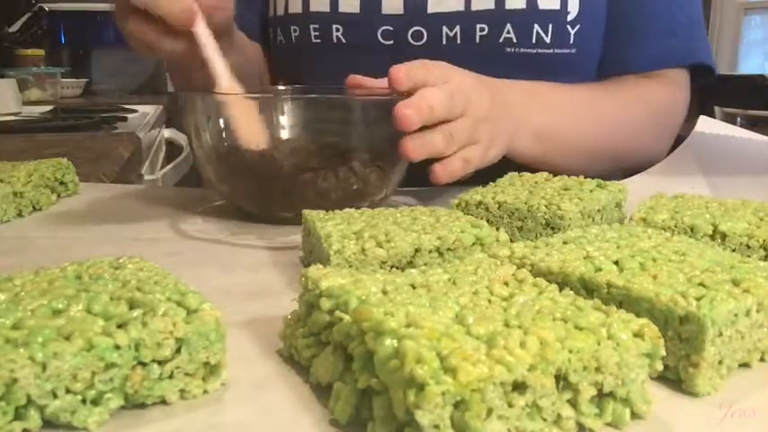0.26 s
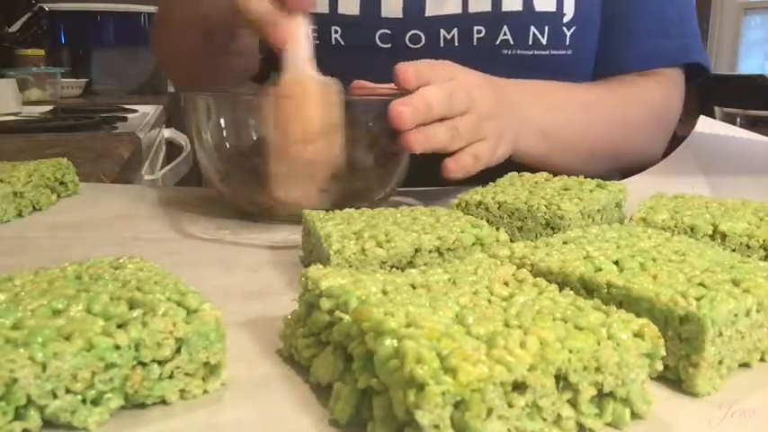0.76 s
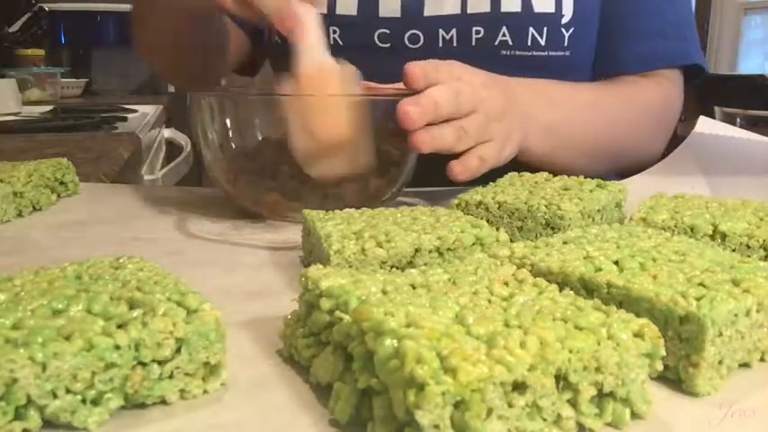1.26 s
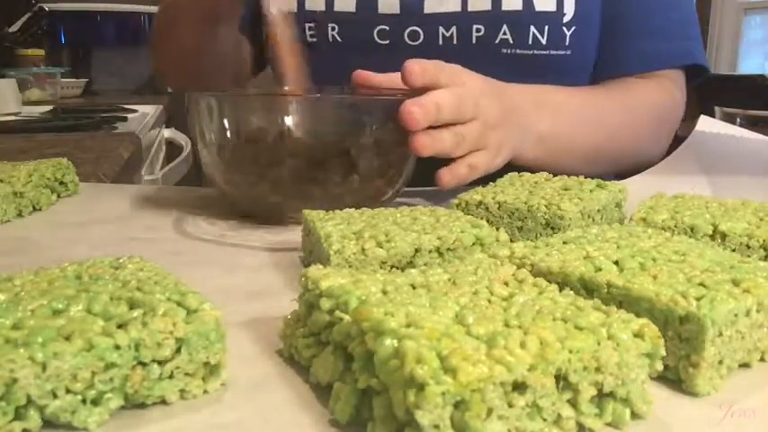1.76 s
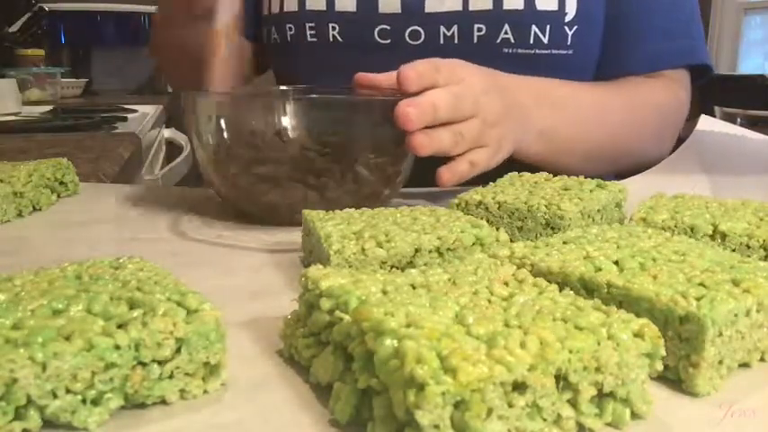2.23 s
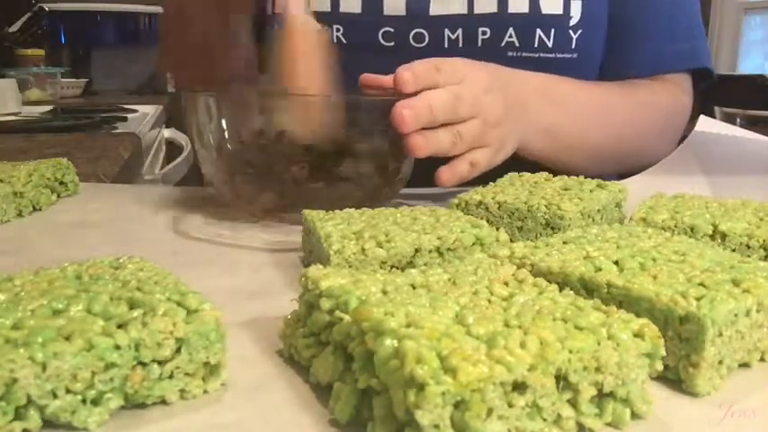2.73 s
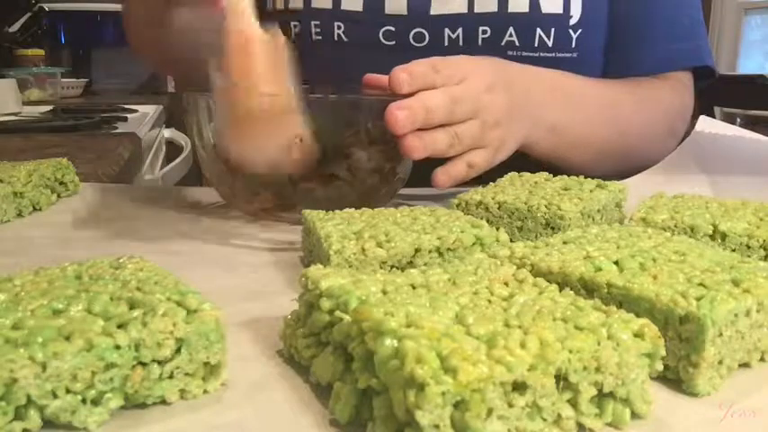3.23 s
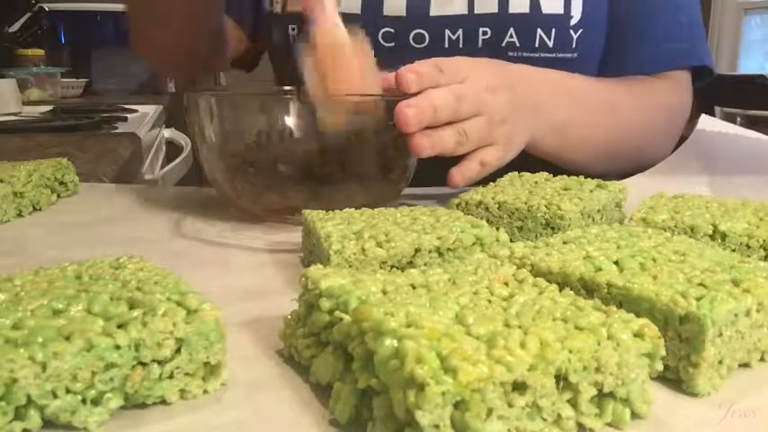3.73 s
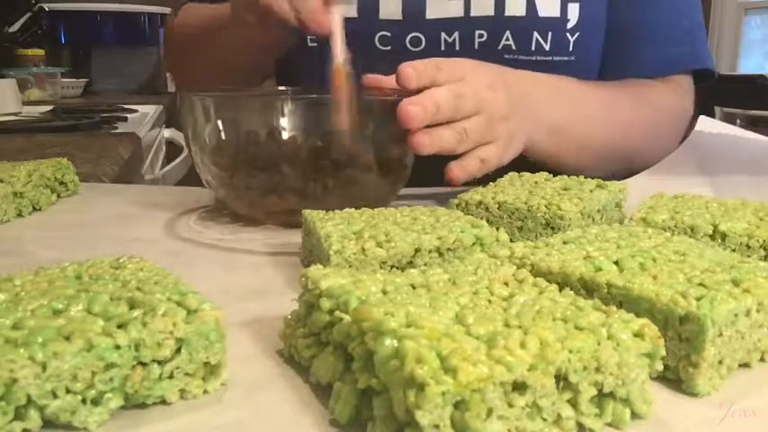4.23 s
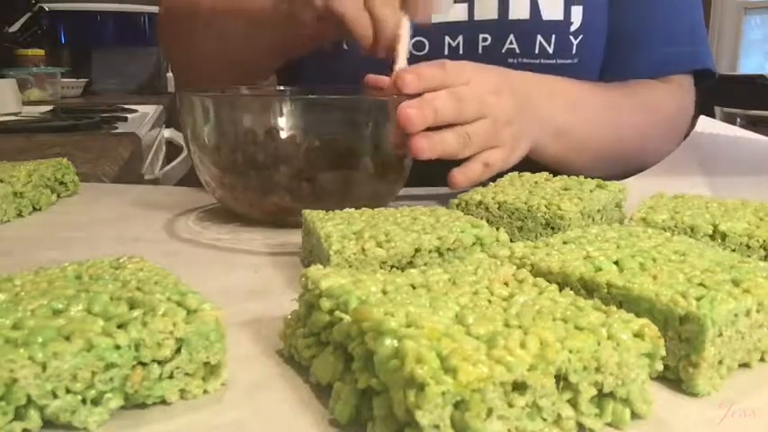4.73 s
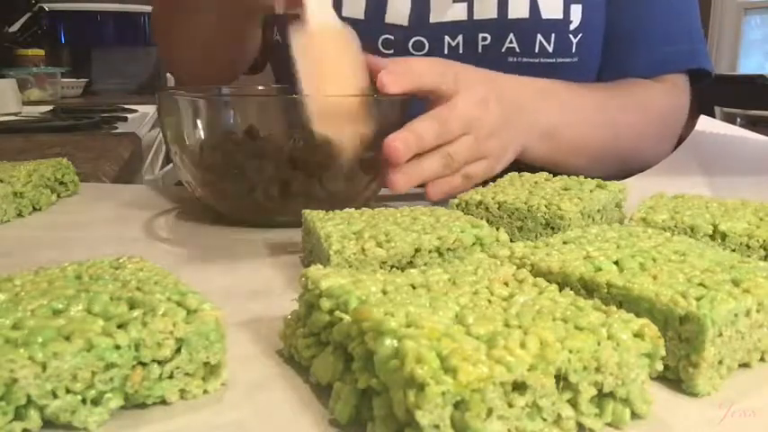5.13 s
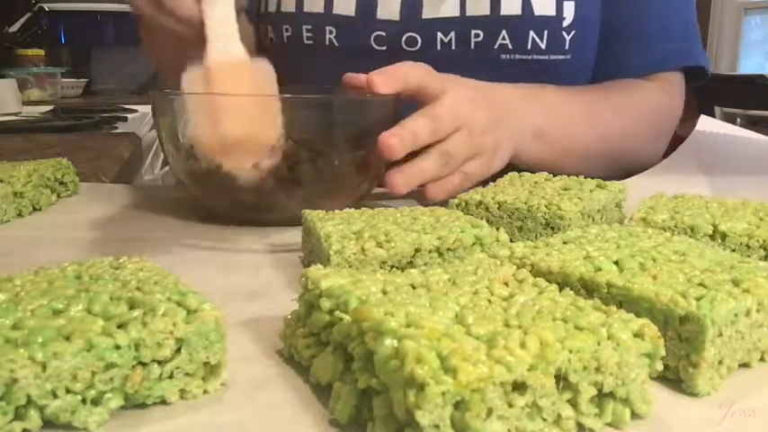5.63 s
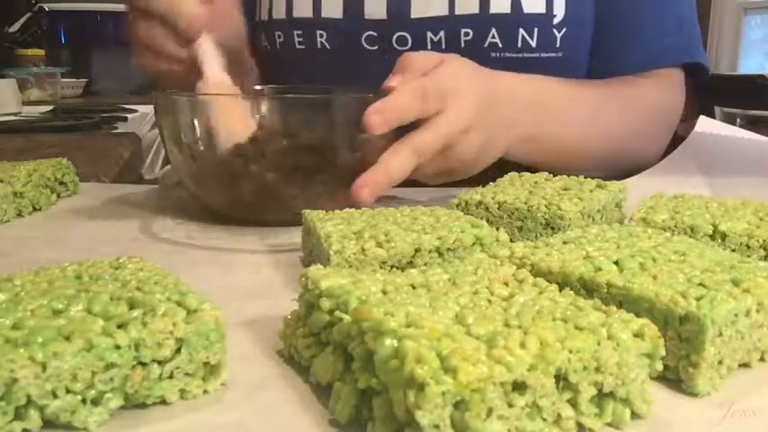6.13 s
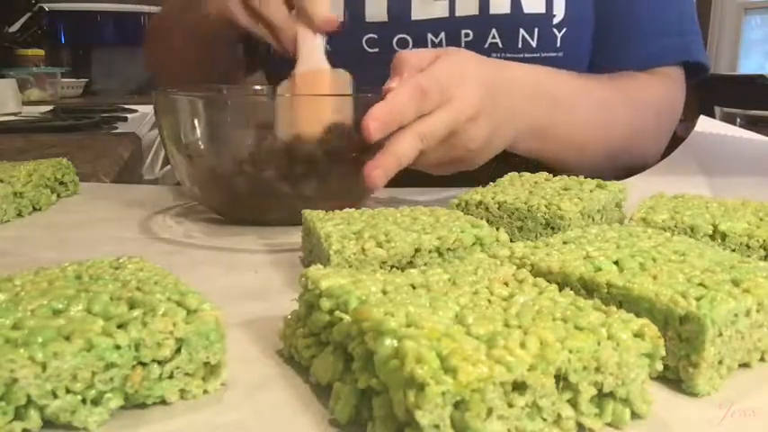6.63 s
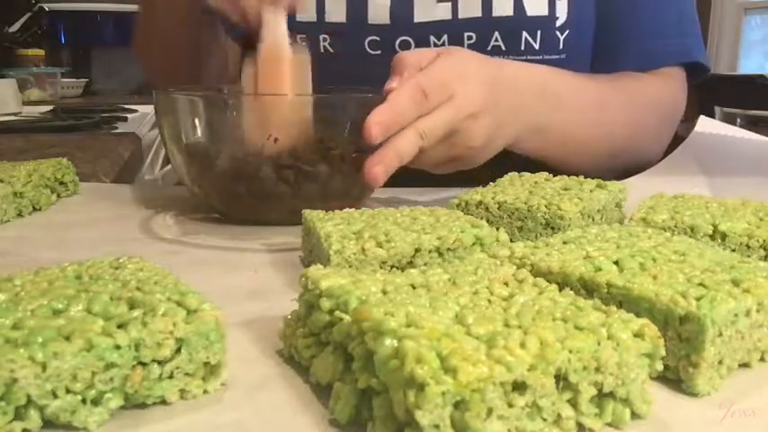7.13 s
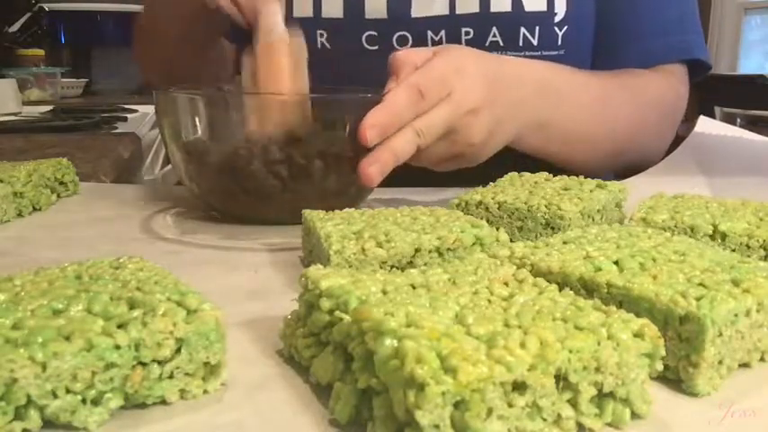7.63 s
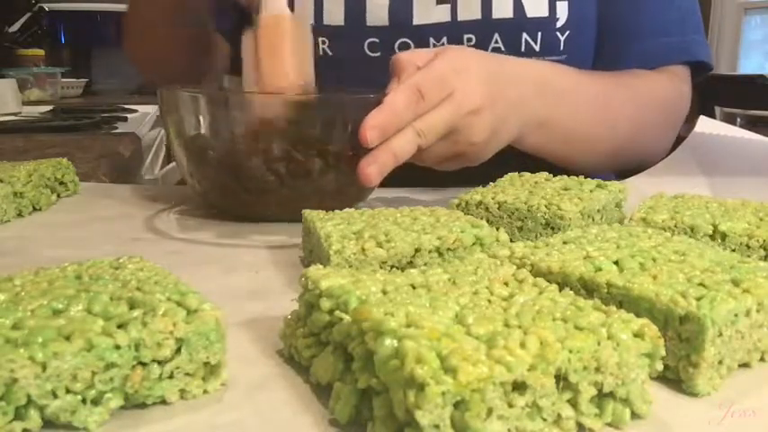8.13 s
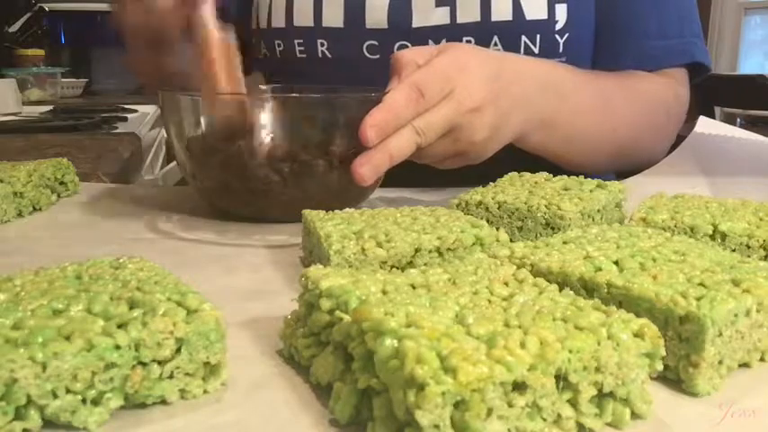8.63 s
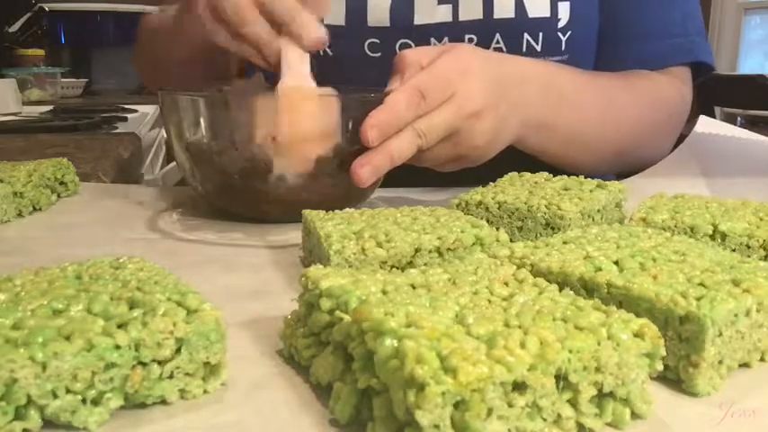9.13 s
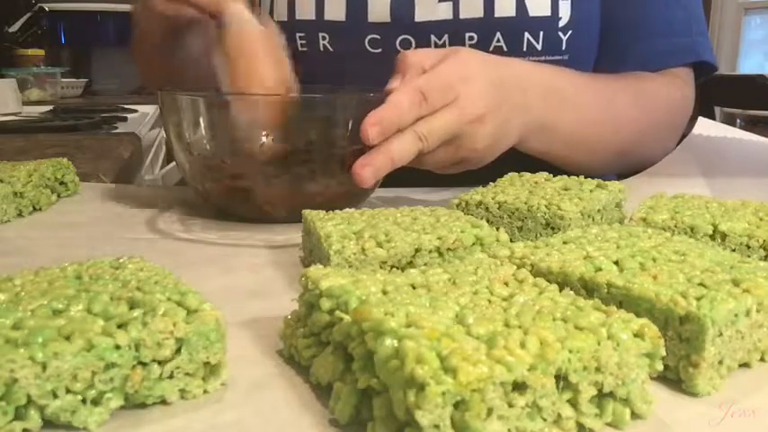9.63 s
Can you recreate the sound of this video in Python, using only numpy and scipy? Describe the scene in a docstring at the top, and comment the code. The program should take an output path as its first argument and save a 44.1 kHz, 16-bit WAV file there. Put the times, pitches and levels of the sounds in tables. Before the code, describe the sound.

Irregular stirring from start to end: short, gritty, squelching strokes of a blade in gooey mixture, with brief clinks against glass that die almost at once. Muffled low bumps follow as the bowl rolls on its foot, with occasional firmer knocks on the counter, tiny cracks of sticky strands and thin, high skids. Heard close in a quiet room with slight reverberation.

```python
"""On a kitchen counter, a spatula stirs a thick melted mixture in a hand-held glass bowl.
Clumped noise grains through coloured filters and small resonators make the blade rub and squelch.
Decaying glass modes and noise make the neck clink; short noise bursts make strands snap and the edge skid.
As the bowl rocks and knocks, low decaying modes give the counter's hollow boom.
Wall reflections and a quiet hush surround it all."""
import sys
import numpy as np
from scipy import signal
from scipy.fft import rfft, irfft
from scipy.io import wavfile

SR = 44100
rng = np.random.default_rng(int(sys.argv[2]) if len(sys.argv) > 2 else 0)


def store_wav(level_fs):
    """Save 16-bit WAV to argv[1]."""
    pcm = np.round(np.clip(np.atleast_2d(level_fs), -1, 1) * 32767)
    wavfile.write(sys.argv[1], SR, pcm.T.astype(np.int16))


N = 435708

# Sweeps of the blade through the mixture. Each row: hardest press in seconds, swell in seconds,
# fade in seconds, level in dB, bareness of the glass in dB.
SWEEPS = [(0.061, 0.051, 0.065, -64, 1), (0.36, 0.19, 0.04, -66, 0.5), (0.54, 0.062, 0.048, -52.5, 4),
          (0.75, 0.18, 0.2, -66.5, 1), (1.0, 0.19, 0.065, -66, 1.5), (1.26, 0.04, 0.063, -58.5, -6.5),
          (1.33, 0.05, 0.088, -63.5, 5), (1.66, 0.098, 0.15, -65.5, 1), (1.85, 0.084, 0.023, -58, -1),
          (2.258, 0.13, 0.054, -63.5, 4.5), (2.478, 0.059, 0.02, -67, 3.5), (2.759, 0.1, 0.061, -57, -2.5),
          (3.392, 0.026, 0.045, -59.5, -2), (3.582, 0.087, 0.03, -63, 2.5), (3.83, 0.018, 0.11, -62.5, 6.5),
          (4.0, 0.072, 0.09, -57.5, 1.5), (4.35, 0.075, 0.063, -64.5, -3), (4.65, 0.022, 0.046, -75.5, 1),
          (4.89, .03, 0.072, -57.5, -3.5), (4.97, 0.046, 0.02, -60.5, -4),
          (5.251, 0.052, 0.027, -60.5, -2.5), (5.389, 0.022, 0.035, -57.5, -0.5),
          (5.449, 0.035, 0.023, -59.5, -1), (5.661, 0.039, 0.029, -66.5, 2),
          (5.952, 0.034, 0.071, -62, 2.5), (6.318, 0.023, 0.036, -63.5, 2.5), (6.46, 0.053, 0.054, -60, 7),
          (6.65, 0.087, 0.055, -74.5, 5.5), (6.809, 0.037, 0.022, -69, 4.5),
          (6.981, 0.085, 0.059, -61.5, 3), (7.359, 0.016, 0.048, -63.5, 4.5),
          (7.95, 0.086, 0.065, -61, 0.5), (8.145, 0.018, 0.051, -65.5, -6),
          (8.37, 0.073, 0.059, -65.5, 0.5), (8.48, 0.077, 0.023, -60.5, -3),
          (8.72, 0.041, 0.21, -62.5, -4.5), (8.97, 0.034, 0.046, -65, -0.5), (9.24, 0.11, .06, -69.5, 2.5),
          (9.6, 0.077, .05, -63.5, -1.5)]
# Clinks of the spatula on glass. Each row: contact in seconds, level in dB,
# hardness in dB (upper modes over the lowest), crack over the ring in dB.
GLASS_TOUCHES = [(0.4983, -37.5, -21.5, -24), (0.5137, -37, -3, -4), (0.5462, -25.5, -7, -7),
                 (1.0234, -40.5, -11.5, 8), (1.4665, -41, -5, -7), (1.472, -45, -15, 13),
                 (1.5678, -40.5, -10, -4), (1.7374, -45.5, -17, -33), (1.8614, -41, -16, -16),
                 (1.9632, -47, -20, -9), (1.976, -45.5, -20, 1), (2.2293, -49.5, -24, -30),
                 (2.268, -47, -6.5, -15), (2.3085, -42.5, -17, -22), (2.753, -35, -3, 0),
                 (2.7756, -33, 11, -14), (2.7894, -31, -5, -7), (3.7998, -32, -6, 3.5),
                 (3.8114, -40, -13, 37), (5.219, -35.5, -3.5, -25), (5.6042, -49, -13, -13),
                 (5.9029, -31.5, 4, 4.5), (5.9419, -43.5, -4, 4), (6.075, -57, -18, -3),
                 (6.1807, -49.5, -26, -12), (6.3885, -37.5, -9, 8), (6.3935, -32.5, -11.5, 4.5),
                 (6.4558, -20.5, 11.5, -2.5), (6.6322, -47.5, -17, -29), (6.8907, -33.5, -6.5, 1),
                 (6.9032, -28, -14.5, -0.5), (7.3361, -47, -15, -16), (7.344, -41, -8, -7),
                 (7.531, -59, -27, -23), (7.8346, -43.5, -15, -1), (8.2053, -51.5, -28, -33),
                 (8.6847, -48.5, -13, -14), (9.1651, -47, -19, -12)]
# Sticky strands snapping. Each row: start in seconds, level in dB, centre in Hz (1100 at least is used).
STRAND_SNAPS = [(0.6587, -46, 2500), (0.7488, -50, 2000), (0.979, -47.5, 1820), (1.1855, -51.5, 1670),
                (1.343, -41.5, 8500), (1.8038, -44.5, 1160), (1.844, -44, 1960), (1.8974, -40.5, 1160),
                (2.0382, -45.5, 8400), (2.132, -41.5, 1117), (2.458, -47, 1980), (2.611, -49, 1500),
                (2.939, -53.5, 1500), (3.0376, -52, 6470), (3.045, -40, 1800), (3.8977, -38.5, 1170),
                (3.9773, -40, 1160), (4.043, -54, 1120), (4.3202, -44.5, 1970), (4.3634, -46, 1090),
                (4.4251, -45.5, 1160), (4.74, -46.5, 10300), (4.9945, -43, 2080), (6.0135, -42.5, 10500),
                (6.552, -45.5, 2290), (6.659, -49, 1980), (7.0713, -48, 2020), (7.4025, -34, 3400),
                (7.96, -38, 1170), (7.9697, -35, 1160), (8.307, -45, 8000), (8.3118, -34, 1100),
                (8.358, -42, 1120), (8.9487, -43, 2120), (9.255, -44, 1260), (9.603, -44, 2090)]
# The blade's edge skidding on bare glass. Each row: start in seconds, level in dB, length in seconds,
# centre in Hz.
EDGE_SKIDS = [(0.025, -43.5, 0.01, 4030), (2.754, -45, 0.018, 11500), (4.861, -54, 0.06, 10300),
              (5.378, -52, 0.043, 12100), (5.838, -49, 0.031, 12400), (6.435, -44, .004, 7960),
              (6.852, -47, 0.008, 10000), (6.967, -36, 0.0054, 9100), (7.961, -43, 0.013, 9400),
              (8.744, -43.5, 0.012, 5240), (8.789, -49, 0.035, 5240), (8.95, -47, 0.014, 5100),
              (9.592, -40.5, 0.0065, 8930)]
# The bowl's foot dropping on the counter. Each row: start in seconds, boom level in dB, clack level in dB.
FOOT_DROPS = [(1.709, -34, -37.5), (2.138, -38.5, -49.5), (3.93, -33, -36), (4.742, -48.5, -96),
              (7.756, -53.5, -48.5), (7.912, -37, -83), (8.313, -33, -67), (8.599, -32, -32.5),
              (9.265, -39.5, -43.5), (9.56, -45, -80)]
# The bowl rocking under the blade. Each row: start in seconds, level in dB, centre of the push in Hz.
BOWL_ROCKS = [(0.028, -50, 184), (0.25, -51.5, 230), (0.52, -63, 225), (0.668, -44.5, 190),
              (0.739, -49.5, 149), (0.85, -53, 210), (1.189, -46, 194), (1.315, -46, 228),
              (1.57, -38.5, 196), (1.955, -44, 166), (1.984, -40.5, 164), (2.327, -44.5, 203),
              (2.466, -41, 189), (2.707, -53.5, 190), (2.938, -47, 210), (3.031, -43.5, 194),
              (3.322, -46.5, 178), (3.374, -45, 203), (3.558, -47.5, 197), (3.795, -38.5, 245),
              (3.825, -39.5, 128), (4.163, -46, 123), (4.313, -43.5, 181), (4.422, -47, 200),
              (4.591, -46.5, 189), (5.235, -50, 242), (5.409, -47, 296), (5.637, -53, 185),
              (5.958, -40.5, 200), (5.972, -36, 195), (6.572, -48.5, 193), (6.623, -50.5, 195),
              (6.995, -45, 200), (7.032, -45, 200), (7.341, -42, 188), (7.396, -39.5, 202),
              (7.846, -43.5, 186), (8.373, -38, 200), (9.159, -44.5, 200), (9.494, -47.5, 160),
              (9.599, -48, 195)]

# Modes of the glass bowl. Each row: frequency in Hz before the blade's pull, level in dB,
# T60 relative to the main mode.
GLASS_MODES = [(2039.5, -1, 1.85), (3494, -3, 1.75), (3680, -0.5, 0.51), (5200, -16, 0.39), (5247, 4, 1.13),
               (5500, -3, 1.7), (7300, -3.5, 1.3), (9480, -15, 1.3), (11850, -26, .5)]
# Modes of the counter with the bowl on it. Each row: frequency in Hz, level in dB, T60 in seconds.
COUNTER_MODES = [(79.4, -12.5, 0.28), (100, -19, 0.18), (127.4, -2.5, 0.11), (178, 0, 0.13),
                 (206.2, -0.5, 0.17), (251.7, 0, 0.096), (291, 2, 0.089), (376.4, -8.5, 0.17),
                 (454.4, -2.5, 0.14), (527.5, -9, 0.12), (603.5, -2, 0.09)]

# Colours of the sounds. Each row: frequency in Hz, level in dB per Hz.
RUB_COLOUR = [(250, -3.5), (500, 3.5), (700, -10.5), (880, 2.5), (1000, 0.5), (1170, 4), (1600, -4),
              (2200, -8.5), (3000, -6), (5000, -34), (12000, -34)]  # blade in the mixture
CRACKLE_COLOUR = [(1200, -6.5), (2800, 2), (4000, 0.5), (5500, -3), (7500, -5.5), (9500, -3.5),
                  (12000, -17.5), (16000, -19.5)]  # fine wet crackle
CONTACT_COLOUR = [(300, -6.5), (900, 14), (1500, 4), (2600, 12.5), (3700, 14.5), (5600, 9.5), (6500, -1.5),
                  (9000, -6.5), (16000, -22.5)]  # gritty touch of the spatula
CRACK_COLOUR = [(1000, -12.5), (4000, -7.5), (9000, -2.5), (12000, -8.5), (14000, -23.5), (16000, -17)]  # crack of a hard touch
CLACK_COLOUR = [(300, -58), (550, -1.5), (700, -3), (880, -1.5), (1000, -10.5), (1150, 0), (1320, -4),
                (1700, -17.5), (3000, -34), (8000, -40)]  # the foot's clack
REFLECTION_COLOUR = [(60, 2.5), (250, 5.5), (1000, -4.5), (5000, -1.5), (8000, -5), (15000, -5.5)]  # the room's reflections
HUSH_COLOUR = [(15, -49.5), (25, -12), (191, -2.5), (278, -8), (673, -24.5), (1150, -22), (1630, -30.5),
               (1960, -23), (2240, -30.5), (15000, -35)]  # the room's hush

CUTOFF_HZ = 16000
AGE = np.arange(SR // 2) / SR  # time since a contact, in seconds
MAIN_HZ = 5222  # reference pitch: the bowl's strongest mode when it rings freely
STROKE_SHAPE = 1.11  # exponent of each swell and fade: 1 is pointed, 2 is bell-shaped
RESTING_DB = -84.5  # the blade never quite leaves the mixture
USUAL_DB = -68  # reference level of an ordinary stroke
RING_T60_S = 0.055  # main mode under the pressed blade, at hardness 0
RING_DOUBLES_DB = 45.5  # a harder touch leaves the glass freer: this much hardness doubles the ring
SAG_HZ, SAG_HZ_PER_DB = 29.3, 1  # load lowers the main mode, less for a hard touch; then varied at random
USUAL_ROCK_HZ = 195  # slower rocking than this heaves the counter more


def from_db(db):
    """Decibels to gain."""
    return 10 ** (np.asarray(db) / 20)


def rms_one(x):
    """Scale to unit rms."""
    return x / np.sqrt(np.mean(x ** 2) + 1e-20)


def peak_one(x):
    """Scale to unit peak."""
    return x / (np.abs(x).max() + 1e-20)


def dying(t60):
    """Exponential decay after a contact, down 60 dB at t60 seconds."""
    return np.exp(-np.log(1000) * AGE / max(t60, 1e-3))


def ring(hz, t60, phase=0):
    """One decaying mode."""
    return np.sin(2 * np.pi * hz * AGE + phase) * dying(t60)


def add(track, s, sound):
    """Mix a sound into the track at time s."""
    start = max(round(s * SR), 0)
    track[start:start + len(sound)] += sound[:N - start]


def through(x, response):
    """Pass x through an impulse response."""
    return signal.fftconvolve(x, response)[:len(x)]


def soften(x, cut_hz):
    """A soft contact passes mostly low frequencies."""
    return signal.sosfilt(signal.butter(3, cut_hz, fs=SR, output="sos"), x)


def response_of(colour, size=4096):
    """Causal (minimum-phase) impulse response with the given spectrum."""
    hz, db = np.transpose(colour)
    grid = np.maximum(np.arange(size // 2 + 1) * SR / size, 1)
    gain = from_db(np.interp(np.log(grid), np.log(hz), db))
    # folding the cepstrum onto positive time puts the energy as early as possible
    cepstrum = irfft(np.log(gain))
    cepstrum[1:size // 2] *= 2
    cepstrum[size // 2 + 1:] = 0
    return irfft(np.exp(rfft(cepstrum)))


def burst(colour, envelope):
    """A spray of tiny contacts with the given colour; peak 1."""
    noise = rng.standard_normal(len(AGE)) * envelope
    return peak_one(through(noise, response_of(colour)))


def drift(per_s):
    """Slow random wander of unit rms, with per_s new targets a second."""
    steps = np.arange(N) / SR * per_s
    return rms_one(np.interp(steps, np.arange(4000), rng.standard_normal(4000)))


def counter_ring(centre_hz, db_per_octave, scatter=0.0):
    """Modes near the pace of the push answer most; phases alternate, with a random scatter."""
    count = len(COUNTER_MODES)
    phases = np.pi * np.arange(count) + scatter * rng.standard_normal(count)
    out = np.zeros(len(AGE))
    for (hz, db, t60), phase in zip(COUNTER_MODES, phases):
        octaves_off = abs(np.log2(hz / centre_hz))
        out += from_db(db - db_per_octave * octaves_off) * ring(hz, t60, phase)
    return out


def stirring(drag_db=-62.5, drag_follows=0.66, rub_db=0.5, sing_db=-4.0, wet_db=-3.0,
             big_db=-8.5, small_db=-7.5, uneven_db=4.0, tick_db=-8.0, hum_db=-12.5,
             fall_db_per_octave=-12.0, glass_t60=0.027, pull=0.96):
    """Stick-slip of the blade shakes counter and glass while air pockets pop in the mixture."""
    rub, sing, wet = pressure(bare_share=0), pressure(bare_share=1.5), pressure(bare_share=1.0)
    uneven = from_db(uneven_db * np.tanh(drift(per_s=35)))  # lumps in the mixture
    drag = (pressure(bare_share=0, stretch=1.17) / from_db(USUAL_DB)) ** drag_follows

    # slow judder passes through the foot into the counter
    judder = grains(per_s=330, spread_db=5.0, clump_db=3.5)
    shaken_counter = through(judder, counter_ring(centre_hz=200, db_per_octave=0.5))
    rumble = rms_one(soften(shaken_counter, cut_hz=408))

    # fine slips, and now and then a coarser catch
    slips = rms_one(grains(per_s=6000, spread_db=1.5, clump_db=6.5))
    catches = rms_one(grains(per_s=40, spread_db=0.0, clump_db=2.5))
    big_bursts = grains(per_s=500, spread_db=-2.0, clump_db=8.0)
    big_pops = squelch(big_bursts, low_hz=620, high_hz=2960, cycles=16)
    small_bursts = grains(per_s=600, spread_db=3.0, clump_db=17.0)
    small_pops = squelch(small_bursts, low_hz=2550, high_hz=14900, cycles=9.9)

    glass = np.zeros(len(AGE))
    for hz, db, lasting in GLASS_MODES:
        level = db + fall_db_per_octave * np.log2(hz / MAIN_HZ)
        glass += from_db(level) * ring(hz * pull, glass_t60 * lasting)

    # slips in the mixture smear dully; slips on bare glass make the bowl sing
    rubbing = slips + from_db(big_db) * big_pops + from_db(tick_db) * catches
    smear = rms_one(through(rubbing, response_of(RUB_COLOUR)))
    singing = rms_one(through(catches + from_db(hum_db) * slips, glass))
    crackle = rms_one(through(slips + from_db(small_db) * small_pops, response_of(CRACKLE_COLOUR)))
    scrape = from_db(rub_db) * rub * smear
    scrape += from_db(sing_db) * sing * singing
    scrape += from_db(wet_db) * wet * crackle
    return from_db(drag_db) * drag * rumble + uneven * scrape


def pressure(bare_share, stretch=1):
    """Every stroke swells and fades; bare_share is how much a sound depends on bare glass."""
    t = np.arange(0, N, 64) / SR
    power = from_db(RESTING_DB) ** 2
    for s, swell, fade, db, bare in SWEEPS:
        away = np.abs(t - s) / (stretch * np.where(t < s, swell, fade))
        stroke = from_db(db + bare_share * bare) * np.exp(-away ** STROKE_SHAPE)
        power = power + stroke ** 2
    return np.interp(np.arange(N) / SR, t, np.sqrt(power))


def grains(per_s, spread_db, clump_db):
    """Random micro-slips of uneven size whose strength swells and sinks in clumps."""
    born = rng.random(N) < per_s / SR
    uneven_db = spread_db * np.minimum(rng.exponential(1, N), 3)
    sizes = from_db(uneven_db + clump_db * np.tanh(drift(per_s=110)))
    return born * sizes * rng.choice([-1, 1], N)


def squelch(pops, low_hz, high_hz, cycles, count=14):
    """Each pop bursts a pocket of one of count sizes, which rings for a few cycles."""
    dealt, out = rng.integers(0, count, N), np.zeros(N)
    for k, hz in enumerate(np.geomspace(low_hz, min(high_hz, CUTOFF_HZ), count)):
        radius = from_db(-60 * hz / (max(cycles, 2) * SR))  # falls 60 dB over the given cycles
        angle = 2 * np.pi * hz / SR
        zeros = [1 - radius, 0, radius - 1]
        poles = [1, -2 * radius * np.cos(angle), radius * radius]
        out += signal.lfilter(zeros, poles, pops * (dealt == k) + 1e-18)
    return rms_one(out)


def clinks(low_db=4.0, upper_db=5.0, tilt=0.43, grit_db=2.0, grit_t60=0.074,
           crack_db=8.5, crack_t60=0.037, build_s=0.00074, twin_db=-8.0, split=0.008,
           after_db=-23.0, after_t60=0.37, graze_db=-16.5, graze_s=0.0048):
    """A graze, then a gritty contact rings the bowl; the pressed blade damps it and lowers its pitch."""
    out, build = np.zeros(N), 1 - np.exp(-AGE / build_s)
    for s, peak, hard, crack in GLASS_TOUCHES:
        sag_hz = (SAG_HZ - SAG_HZ_PER_DB * hard) * rng.uniform(0.92, 1.41)
        pull = 1 - sag_hz / MAIN_HZ
        t60 = RING_T60_S * 2 ** (hard / RING_DOUBLES_DB)
        grit = from_db(grit_db) * burst(CONTACT_COLOUR, dying(grit_t60))
        snap = from_db(crack + crack_db) * burst(CRACK_COLOUR, dying(crack_t60))
        sound = from_db(max(hard, 0)) * (grit + snap)
        for k, (hz, db, lasting) in enumerate(GLASS_MODES):
            # a hard touch reaches the high modes, a padded one mostly the lowest
            level = upper_db + hard * (1 + tilt * np.log2(hz / MAIN_HZ)) if k else low_db
            # the load of mixture splits each mode into a beating pair
            twin_hz = hz * pull * (1 - split * rng.uniform(-0.5, 1.3))
            twin = from_db(twin_db) * ring(twin_hz, t60 * lasting, rng.uniform(0, 2 * np.pi))
            # a faint part escapes the blade and rings on
            after = from_db(after_db) * ring(hz * pull, after_t60 * lasting / 2)
            sound += from_db(level + db) * (ring(hz * pull, t60 * lasting) + twin + after)
        add(out, s, from_db(peak) * peak_one(sound * build))
        graze = burst(CONTACT_COLOUR, np.exp(-(AGE / graze_s - 1) ** 2))
        add(out, s - graze_s, from_db(peak + graze_db) * graze)
    return out


def snaps(crack_db=-4.0, spray_db=0.5, spray_t60=0.045):
    """A strand or air pocket breaks: one sharp crack with a short, dying spray of smaller ones."""
    out = np.zeros(N)
    for s, peak, hz in STRAND_SNAPS:
        centre = max(hz, 1100)
        colour = [(350, -18), (800, -5), (centre, 0), (centre * 1.15, -4), (centre * 3, -12), (50000, -25)]
        spray = burst(colour, dying(spray_t60))
        add(out, s, from_db(peak + crack_db) * peak_one(response_of(colour)))
        add(out, s, from_db(peak + spray_db) * spray)
    return out


def skids(skirt_db=-23.0):
    """Very fast stick-slip gives a short, narrow rasp."""
    out = np.zeros(N)
    for s, peak, length, hz in EDGE_SKIDS:
        colour = [(hz / 10, 2 * skirt_db), (hz * 0.49, skirt_db), (hz, 0), (hz * 1.3, skirt_db)]
        add(out, s, from_db(peak) * burst(colour, np.exp(-(AGE / length) ** 2)))
    return out


def knocks(boom_db=4.0, clack_db=0.0, clack_t60=0.06, open_hz=950, firmness=0.16, rise_s=0.0023):
    """The foot lands with a clack and the counter swings up after it, more brightly for a hard landing."""
    out, swell = np.zeros(N), 1 - np.exp(-AGE / rise_s)
    for s, peak, hard in FOOT_DROPS:
        modes = counter_ring(centre_hz=540, db_per_octave=2.0, scatter=1.57)
        boom = soften(swell * modes, open_hz * from_db(firmness * (hard - peak)))
        add(out, s, from_db(peak + boom_db) * peak_one(boom))
        add(out, s, from_db(hard + clack_db) * burst(CLACK_COLOUR, dying(clack_t60)))
    return out


def rocking(level_db=3.0, soft_hz=400, rise_s=0.0096, hold_s=0.058, heave_db=-11.5,
            heave_db_per_octave=19.0, heave_hz=84, heave_s=0.012):
    """The bowl rolls on its foot: a soft push that the hand soon stills, and a deep heave under the weight."""
    out = np.zeros(N)
    swell = (1 - np.exp(-AGE / rise_s)) * np.exp(-(AGE / hold_s) ** 2)
    for s, peak, hz in BOWL_ROCKS:
        modes = counter_ring(centre_hz=hz, db_per_octave=6.0, scatter=1.53)
        boom = soften(swell * modes, soft_hz)
        varied_hz = heave_hz * rng.uniform(0.837, 1.366)
        heave = AGE * np.exp(-AGE / heave_s) * np.sin(2 * np.pi * varied_hz * AGE)
        deep_db = heave_db + heave_db_per_octave * np.log2(USUAL_ROCK_HZ / hz)
        push = from_db(peak + level_db) * peak_one(boom)
        add(out, s, push + from_db(peak + deep_db) * peak_one(heave))
    return out


def kitchen(x, wet_db=-10.5, t60=0.27, build_s=0.002):
    """Dense wall reflections build up over two milliseconds, then die away."""
    noise = through(rng.standard_normal(len(AGE)), response_of(REFLECTION_COLOUR))
    tail = noise * dying(t60) * np.minimum(AGE / build_s, 1)
    tail = tail / np.sqrt(np.sum(tail ** 2))
    return x + from_db(wet_db) * through(x, tail)


def room_hush(level_db=-71.0):
    """Steady coloured noise gives the room's quiet, mostly low hush."""
    noise = rng.standard_normal(N)
    return from_db(level_db) * rms_one(through(noise, response_of(HUSH_COLOUR)))


def scene():
    """The stirred bowl in a quiet kitchen."""
    bowl = stirring() + clinks() + snaps() + skids() + knocks() + rocking()
    return (kitchen(bowl) + room_hush())[None]


def record(dry, low_cut_hz=55):
    """The microphone drops the deep bass; the top is cut steeply."""
    thin = signal.sosfilt(signal.butter(3, low_cut_hz, "high", fs=SR, output="sos"), dry)
    return signal.sosfilt(signal.ellip(10, 0.2, 70, CUTOFF_HZ, fs=SR, output="sos"), thin)


dry = scene()
out = record(dry)
store_wav(out)
```